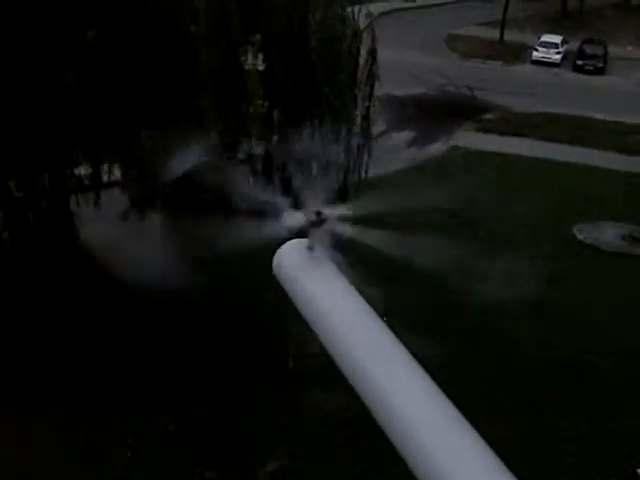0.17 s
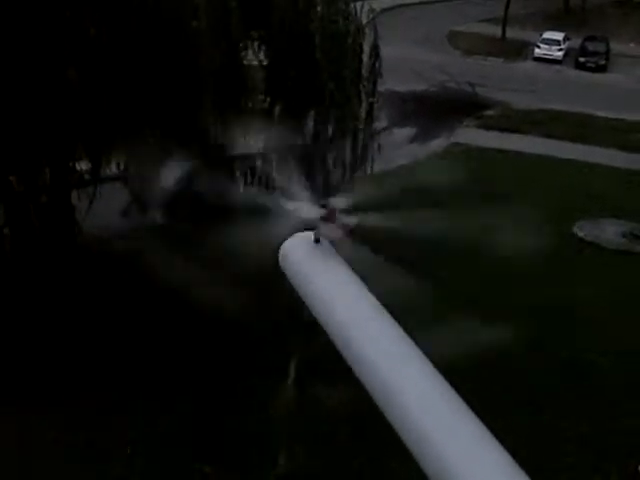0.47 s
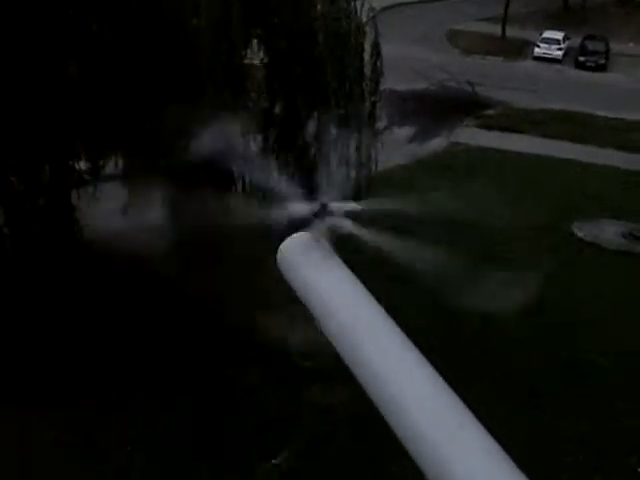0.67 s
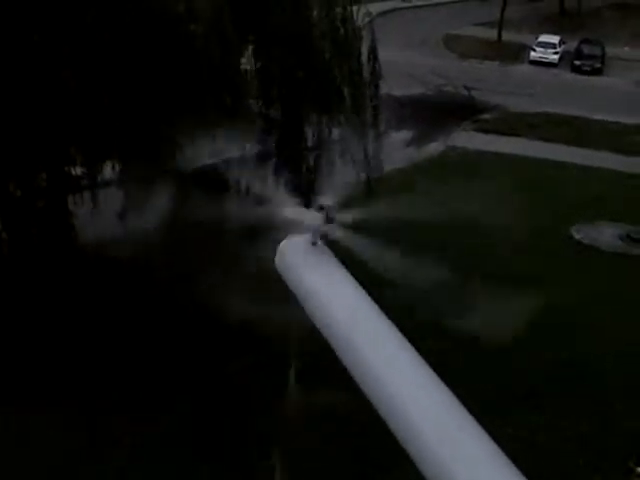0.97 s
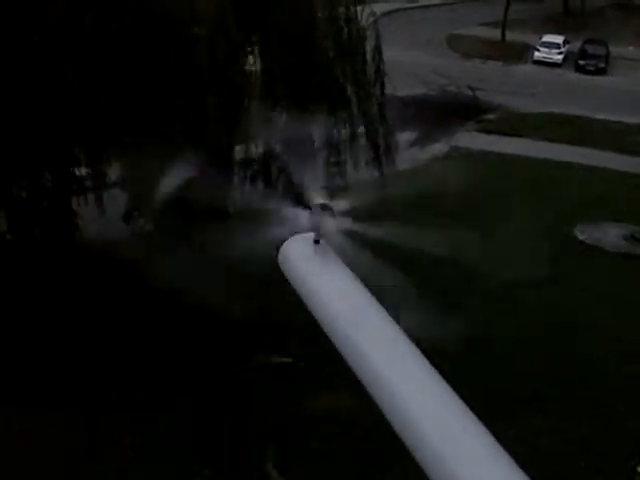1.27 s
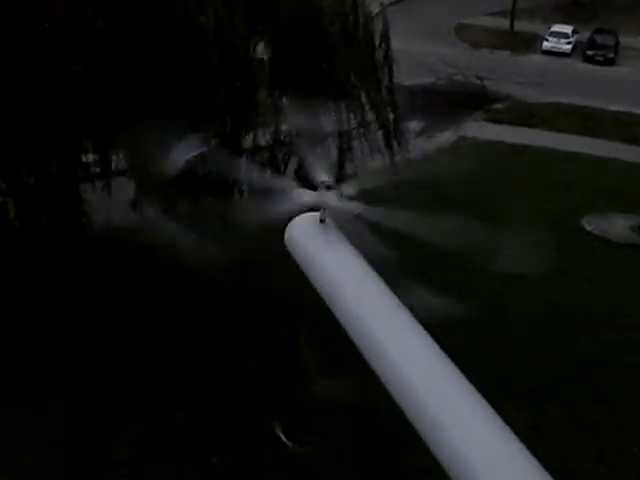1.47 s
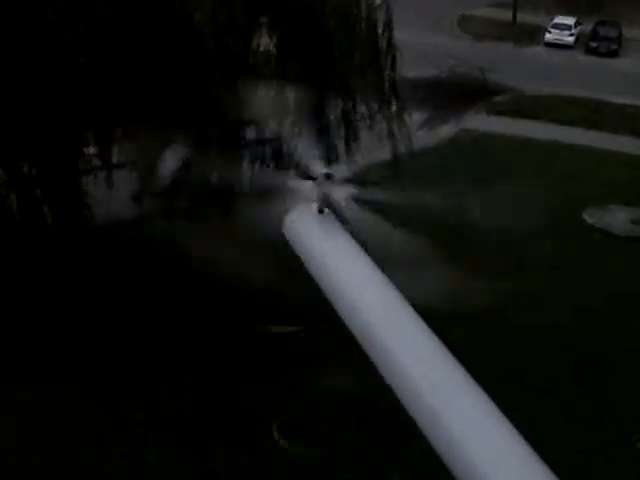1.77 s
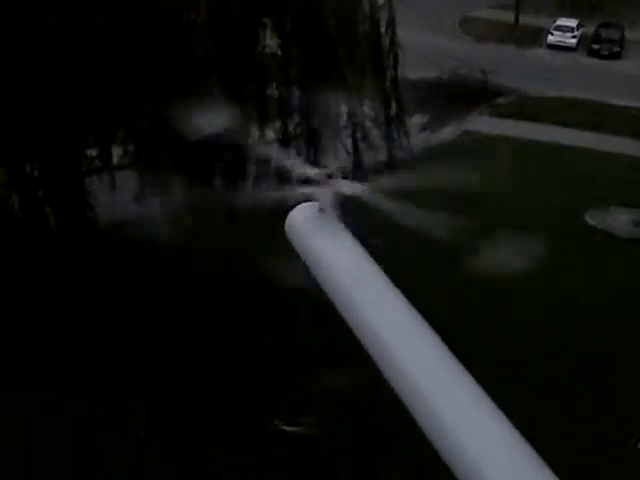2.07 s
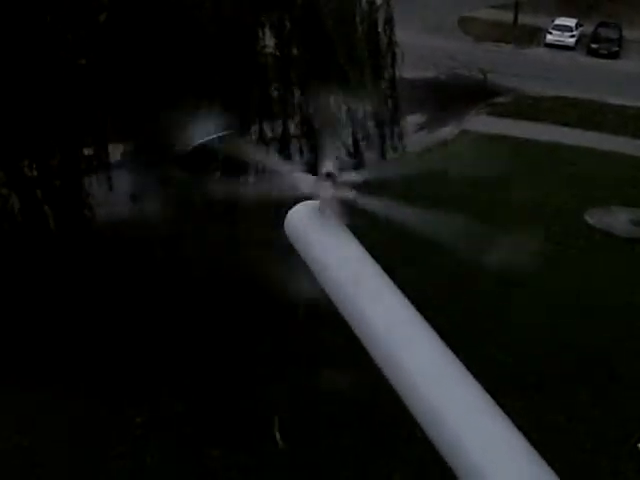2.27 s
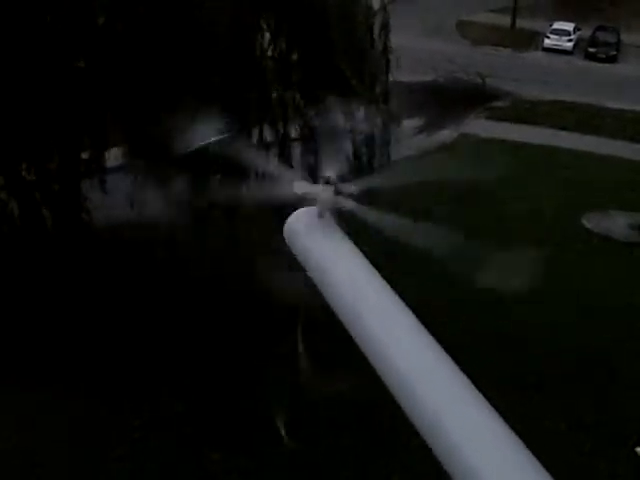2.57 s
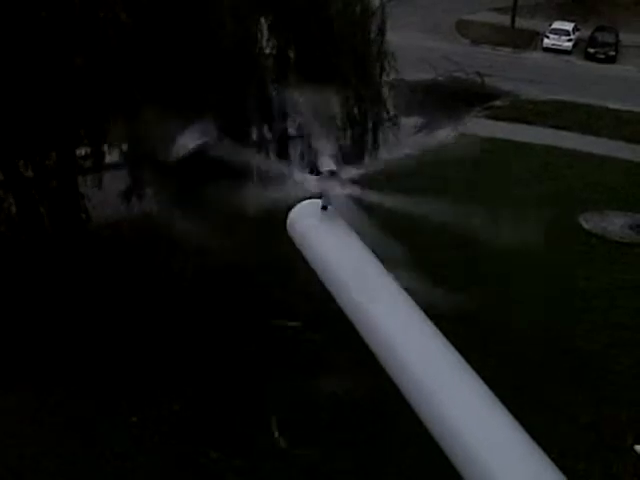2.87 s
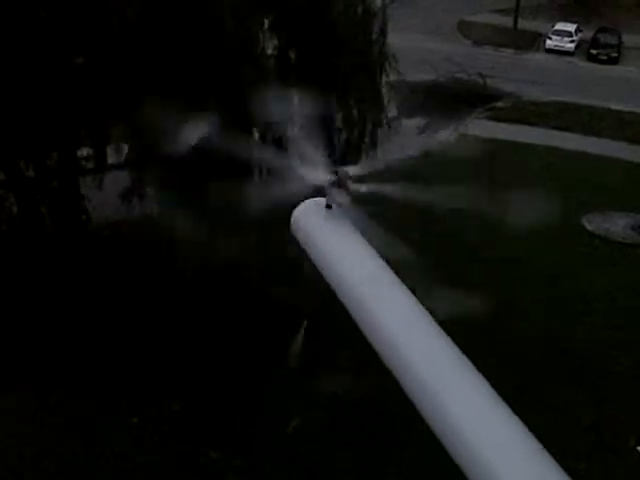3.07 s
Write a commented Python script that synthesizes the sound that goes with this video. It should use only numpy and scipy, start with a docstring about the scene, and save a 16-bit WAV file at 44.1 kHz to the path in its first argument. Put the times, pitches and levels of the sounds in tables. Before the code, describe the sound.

Wind rushes and buffets the microphone, with a small turbine's faint hum and whir.

```python
"""On a lawn, close to a small spinning wind turbine, with a hand-held microphone.
From the start air rushes through the blades and trees, with a low hum and a faint wavering whir in it.
Gusts buffet the microphone in low thumps, and a few light ticks come through.
Just before two seconds in the gusts die down; the hum grows and creeps upward, the leaves hiss on."""
import sys
import numpy as np
from scipy import signal
from scipy.fft import rfft, irfft, next_fast_len
from scipy.io import wavfile

SR = 44100
rng = np.random.default_rng(int(sys.argv[2]) if len(sys.argv) > 2 else 0)


def unload_wav(signal):
    """Save mono or channel-first audio to the path in sys.argv[1] as 16-bit WAV at rate SR, clipped to [-1, 1]."""
    wavfile.write(
        sys.argv[1],
        SR,
        np.round(np.clip(np.atleast_2d(signal).T, -1, 1) * 32767).astype(np.int16),
    )


N = 142002

# Wind at the microphone between buffets: time_s, level_db
WIND_LEVEL = [(0, -49), (.16, -52.5), (.29, -53.5), (.42, -54), (.9, -50.5), (1.0, -48), (1.3, -48),
              (1.47, -50), (1.74, -46), (1.81, -58.5), (2.0, -53.5), (2.3, -53), (2.42, -57.5), (2.52, -52),
              (2.68, -56.5), (2.8, -54), (3.03, -58), (3.22, -53)]
# Bright spectrum of the ticks and the leaf patter: frequency_hz, relative_db
TICK_SPECTRUM = [(20, -32), (800, -9.5), (3100, 8.5), (4600, -6), (6500, 8), (8000, -20.5)]


def undb(db):
    """Decibels to gain."""
    return 10 ** (np.asarray(db) / 20)


def curve(rows, column=1):
    """One column of a table, joined by straight lines in time."""
    rows = np.array(rows, float)
    return np.interp(np.arange(N) / SR, rows[:, 0], rows[:, column])


def noise(gain):
    """Noise of rms 1 with a given gain at each frequency."""
    size = next_fast_len(N)
    hz = np.maximum(np.fft.rfftfreq(size, 1 / SR), 1)
    shaped = irfft(rfft(rng.standard_normal(size)) * gain(hz), size)[:N]
    return shaped / shaped.std()


def coloured(spectrum):
    """Noise of rms 1 shaped by rows of frequency_hz, relative_db."""
    hz, db = np.array(spectrum, float).T
    return noise(lambda f: undb(np.interp(np.log(f), np.log(hz), db)))


def wander(rate_hz):
    """Random drift with a spread of 1, mostly slower than rate_hz."""
    return noise(lambda f: 1 / (1 + (f / rate_hz) ** 2) ** 2)


def eddies(low_hz, edge_hz, order=3.87):
    """Turbulent pressure: flat from low_hz up to an edge, then falling steeply."""
    return noise(lambda f: f / np.hypot(f, low_hz) / np.sqrt(1 + (f / edge_hz) ** (2 * order)))


def wind_rumble():
    """Wind flows past the microphone; the stronger it is, the higher the rumble reaches."""
    wind_db = curve(WIND_LEVEL)
    reference_db, db_per_octave = -47, 11.5
    edge_hz = 72 * 2 ** ((wind_db - reference_db) / db_per_octave)
    gain = undb(wind_db + 2.1 * wander(14))
    # The edge moves by crossfading four noises whose edges lie an octave apart.
    edges_hz = 40 * 2. ** np.arange(4)
    shares = [np.interp(np.log(edge_hz), np.log(edges_hz), row) for row in np.eye(len(edges_hz))]
    return gain * sum(np.sqrt(share) * eddies(23, hz) for share, hz in zip(shares, edges_hz))


def air_rush():
    """Air rushes through blades and trees with a slight flutter."""
    # Spectrum of the rushing air: frequency_hz, relative_db
    spectrum = [(20, -8), (100, 2), (190, 1), (270, 1), (330, -2), (390, 0.5), (450, -2.5), (540, -2.5),
                (630, 2), (800, 2), (900, 0), (1010, -3), (1180, 1), (1380, -0.5), (1600, -5.5),
                (2000, -10.5), (2600, -17.5), (4000, -32), (8000, -47.5)]
    # Strength of the rush: time_s, level_db
    levels = [(0, -54.5), (.7, -53.5), (1.5, -55.5), (2.0, -54), (2.6, -53.5), (3.22, -53)]
    return coloured(spectrum) * undb(curve(levels) + .5 * wander(32))


def leaves():
    """Leaves give a thin, restless hiss and a faint patter that grows in the gusts."""
    # Spectrum of the leaf hiss: frequency_hz, relative_db
    spectrum = [(20, -35), (1500, -8.5), (2600, -5.5), (3500, 3.5), (4200, -5), (4800, -5.5), (5600, -1),
                (6400, 0), (7000, -4.5), (7400, -19.5), (8000, -30.5)]
    # Slow rise of the hiss: time_s, level_db
    levels = [(0, -72.5), (.8, -72), (1.6, -71), (2.4, -69.5), (3.22, -68.5)]
    hiss = coloured(spectrum) * undb(curve(levels) + .3 * wander(25) + .5 * wander(220))
    flicks_per_s, spread_db, decay_s, patter_db = 60, 1.5, 0.0049, -83
    onsets = rng.random(N) < flicks_per_s / SR
    flicks = onsets * undb(spread_db * np.clip(rng.standard_normal(N), -2, 2))
    patter = signal.lfilter([1], [1, -np.exp(-1 / (decay_s * SR))], flicks)
    patter *= undb(.6 * curve(WIND_LEVEL))  # 0.6 dB per dB of wind
    patter /= np.sqrt(np.mean(patter ** 2))
    return hiss + undb(patter_db) * patter * coloured(TICK_SPECTRUM)


def low_hum():
    """A low, unsteady tone sags a little, then creeps upward."""
    # Course of the hum: time_s, pitch_hz, level_db
    course = [(0, 112.5, -62.5), (1.75, 107.3, -63.5), (1.87, 110.2, -56.5), (2.17, 110.8, -63.5),
              (2.28, 113.3, -56.5), (2.42, 114, -68.5), (2.53, 116.8, -54), (2.63, 115.9, -60),
              (2.9, 118.3, -58), (3.22, 118.3, -55.5)]
    pitch_hz = curve(course) * (1 + 0.013 * wander(20))
    tone = np.sqrt(2) * np.sin(2 * np.pi * np.cumsum(pitch_hz) / SR)
    return tone * undb(curve(course, column=2) + wander(4.7))


def rotor_whir():
    """Narrow resonances ring faintly as the rotor turns."""
    # Resonances of the whir: pitch_hz, half_width_hz, level_db
    resonances = [(270.2, 18, -72), (613, 11, -70.5), (767, 21, -71.5), (845, 15, -70), (1264, 7.5, -76)]
    return sum(undb(db) * noise(lambda f: 1 / (1 + ((f - hz) / half_width_hz) ** 2))
               for hz, half_width_hz, db in resonances)


def wind_buffets():
    """Each eddy that hits the microphone is a brief swell of a few pressure swings."""
    # Buffets on the microphone: centre_s, half_length_s, level_db, edge_hz
    buffets = [(0.059, 0.023, -36.5, 94), (.115, 0.059, -45.5, 138), (.378, .016, -43.5, 110.4),
               (0.418, 0.018, -35, 146), (0.461, 0.024, -35, 125), (0.534, 0.023, -38, 168),
               (0.594, 0.034, -40.5, 168), (0.65, .026, -37, 105), (0.697, 0.014, -44.5, 232),
               (0.755, 0.036, -37.5, 130), (0.812, 0.019, -43.5, 162), (0.867, 0.032, -38.5, 120),
               (0.948, .026, -40, 187), (1.059, 0.015, -41, 187), (1.08, 0.023, -36.5, 106.3),
               (1.19, 0.033, -38.5, 189), (1.223, 0.01, -37, 120), (1.262, 0.021, -33, 145),
               (1.281, 0.015, -30, 197), (1.346, 0.047, -37, 175), (1.393, 0.042, -41.5, 184),
               (1.514, 0.023, -37.5, 163), (1.593, 0.0096, -41, 105), (1.679, 0.069, -43, 111),
               (1.721, 0.034, -44.5, 139), (3.11, 0.017, -45.5, 70)]
    t, out = np.arange(N) / SR, np.zeros(N)
    for centre_s, half_length_s, level_db, edge_hz in buffets:
        swell = np.exp(-2 * ((t - centre_s) / half_length_s) ** 2)
        thump = swell * eddies(0.18 * edge_hz, edge_hz)
        out += undb(level_db) * thump * np.sqrt(np.sum(swell ** 2) / np.sum(thump ** 2))
    return out


def light_ticks(rise_s=0.0029, decay_s=0.012):
    """Light, dry ticks stand just above the hiss, each a short burst of bright noise."""
    # Single ticks: start_s, level_db
    ticks = [(0.35, -62.5), (.691, -65), (0.751, -67), (.77, -75), (.885, -65), (1.135, -74), (1.26, -69),
             (1.274, -67), (2.317, -63)]
    t, envelope = np.arange(N) / SR, np.zeros(N)
    for start_s, level_db in ticks:
        age_s = np.maximum(t - start_s, 0)
        rise = np.minimum(age_s / rise_s, 1)
        decay = np.exp(-np.maximum(age_s - rise_s, 0) / decay_s)
        envelope += undb(level_db) * rise * decay
    return envelope * coloured(TICK_SPECTRUM)


def scene():
    """Wind, trees and turbine as they meet one microphone."""
    wind = wind_buffets() + wind_rumble()
    return (wind + air_rush() + leaves() + low_hum() + rotor_whir() + light_ticks())[None]


def record(dry):
    """The recorder cuts the top steeply."""
    top_hz = 7750
    return signal.sosfilt(signal.ellip(10, .2, 80, top_hz, fs=SR, output="sos"), dry)


dry = scene()
out = record(dry)
unload_wav(out)
```